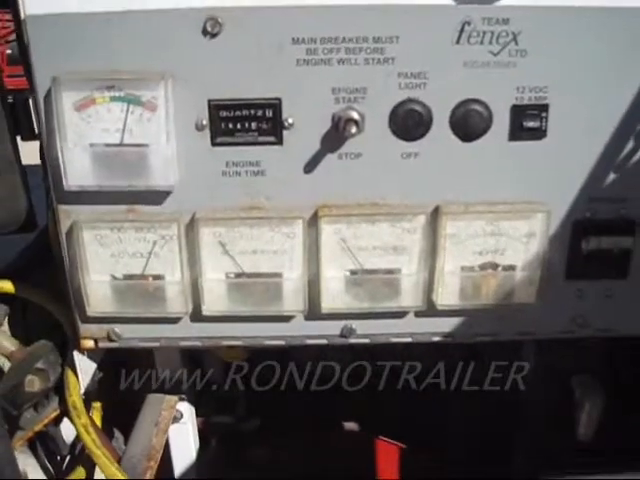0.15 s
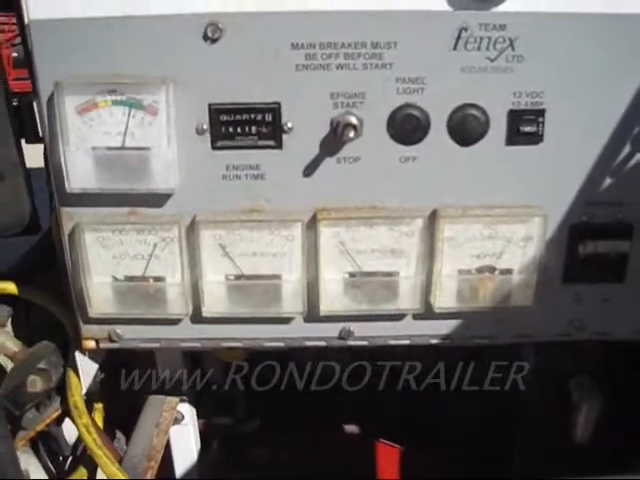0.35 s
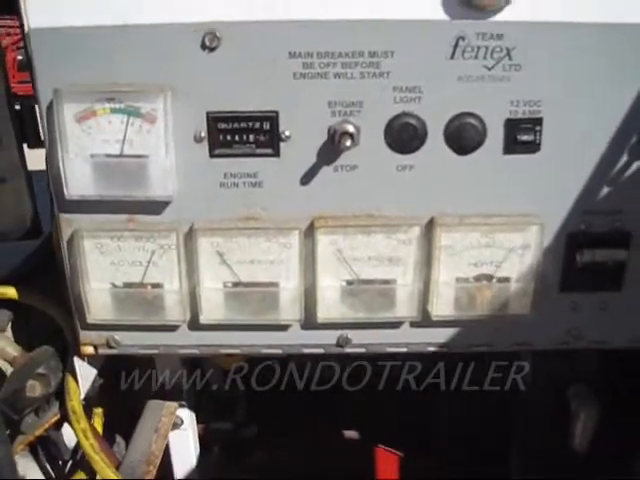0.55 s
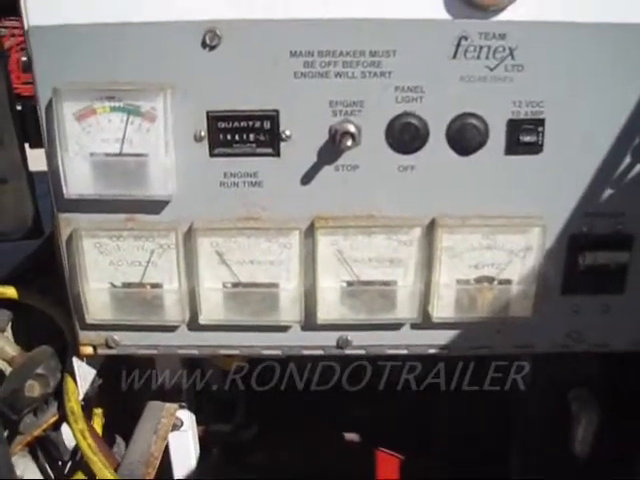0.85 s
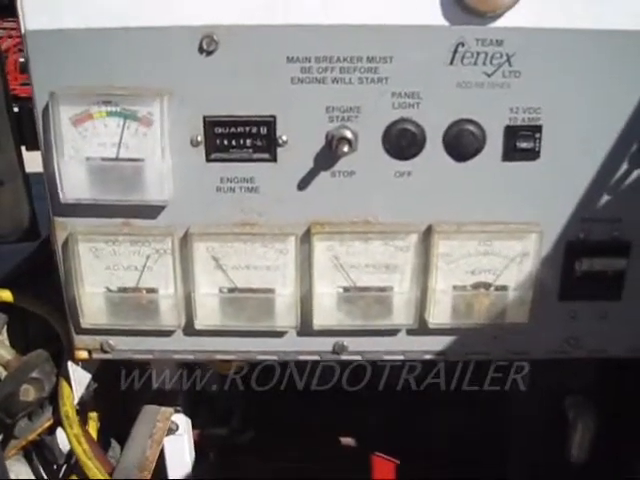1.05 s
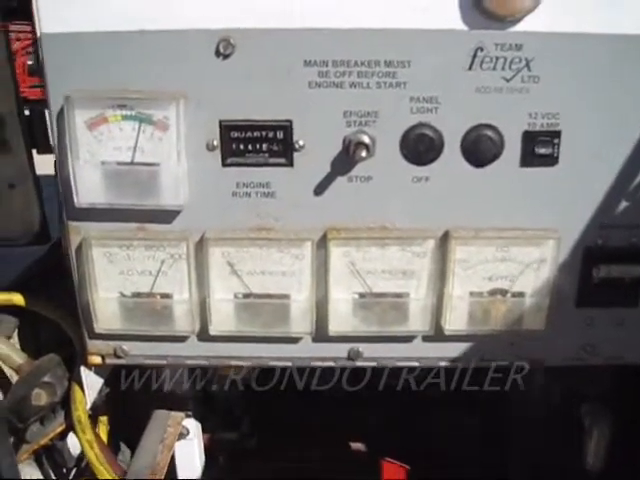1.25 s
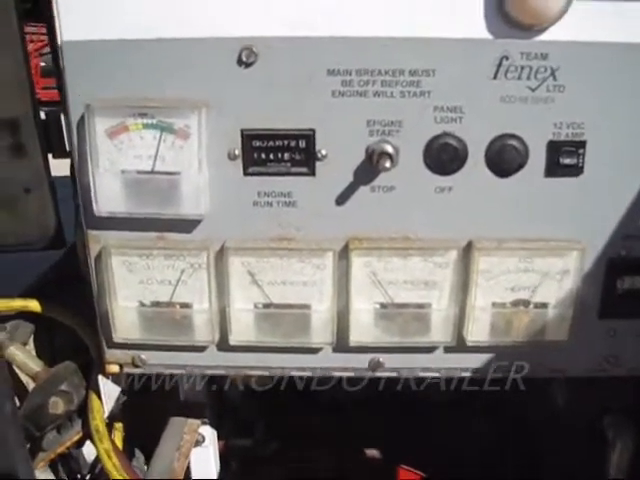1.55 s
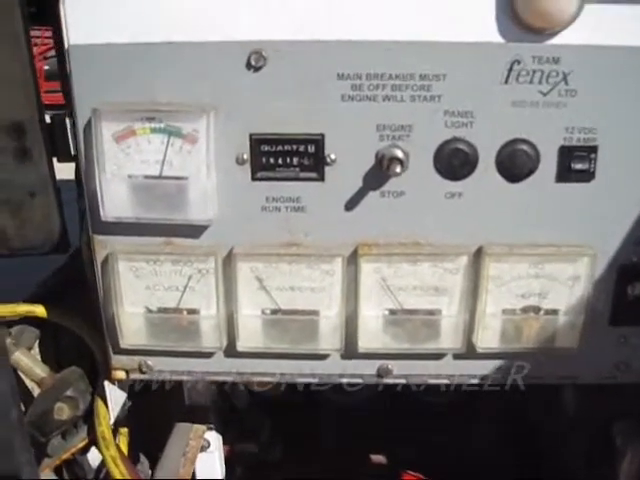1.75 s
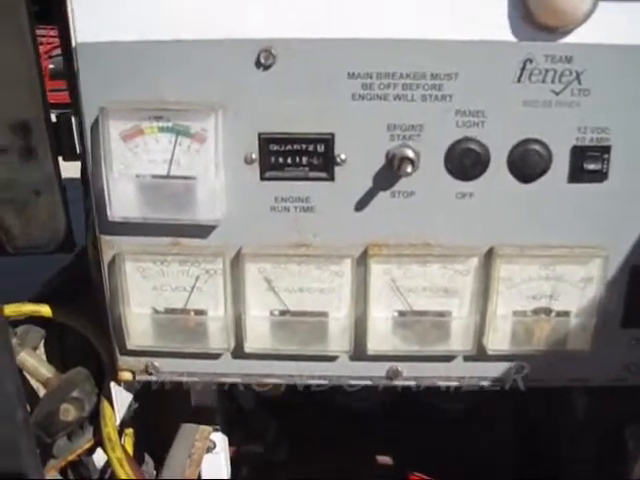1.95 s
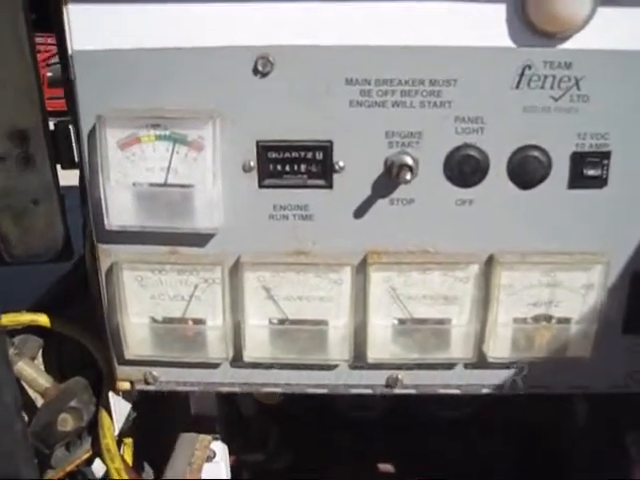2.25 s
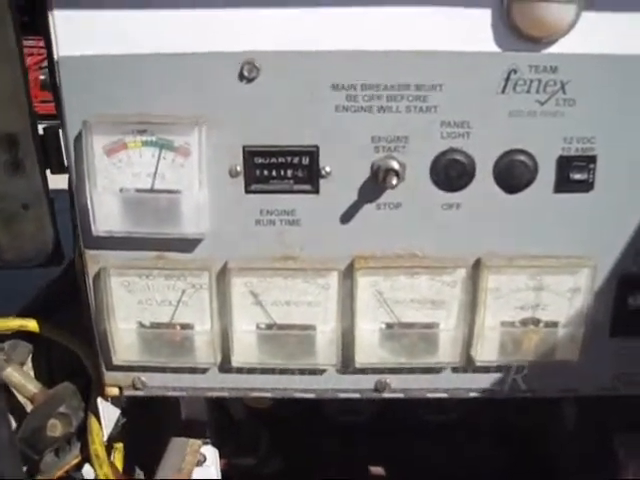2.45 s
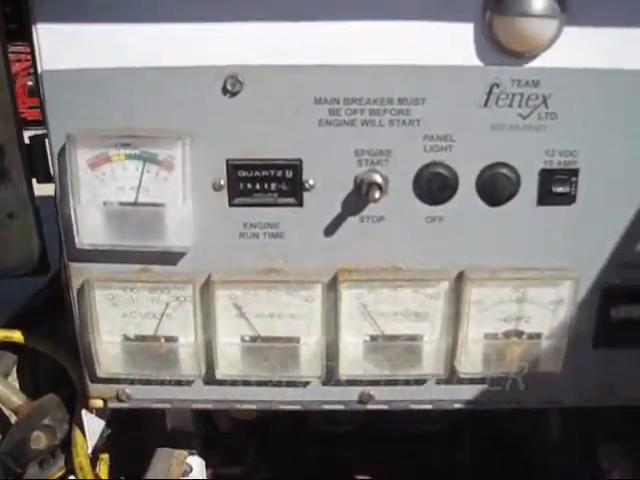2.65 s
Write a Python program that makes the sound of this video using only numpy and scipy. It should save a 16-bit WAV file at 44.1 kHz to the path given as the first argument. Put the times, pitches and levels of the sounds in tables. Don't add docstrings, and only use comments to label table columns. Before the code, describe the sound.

A small four-stroke generator engine runs steadily in an equipment bay, its low boomy drone rising slightly then sagging under load, with blower air behind and a faint metal rattle near the end, close mono microphone.

```python
import sys
import numpy as np
from scipy import signal
from scipy.io import wavfile
from scipy.ndimage import uniform_filter1d

SR = 44100
rng = np.random.default_rng(int(sys.argv[2]) if len(sys.argv) > 2 else 0)


def decibels_to_gain(level_db):
    exponent = np.asarray(level_db, float) / 20
    return 10 ** exponent


def persist_wave(psi):
    counts = np.round(np.clip(psi, -1, 1) * 32767).astype(np.int16)
    wavfile.write(sys.argv[1], SR, np.atleast_2d(counts).T)


N = 123479

# time_s, hum_hz
ENGINE_HUM = [(0.0, 61.41), (0.15, 61.57), (0.3, 62.38), (0.5, 62.56), (0.7, 62.99), (0.9, 62.36),
              (1.1, 61.95), (1.3, 61.2), (1.5, 60.51), (1.7, 59.84), (1.9, 59.58), (2.1, 59.4),
              (2.3, 58.81), (2.55, 58.79), (2.8, 58.99)]
# time_s, nearness_db
NEARNESS = [
    (0, -32),
    (.3, -30.5),
    (.6, -27.5),
    (.9, -27.5),
    (1.2, -28),
    (1.5, -28),
    (1.8, -30.5),
    (2.1, -28.5),
    (2.45, -29.5),
    (2.8, -31),
]
# multiple, level_db [rms at 59.5 Hz hum], slope_db_per_hz [of hum]
ENGINE_ORDERS = [(4, -23.5, -0.9), (5, -49, -2), (8, -34, 2), (9, -33, 0.8), (11, -33.5, -0.8),
                 (12, -32, -0.64), (16, -35, 0.5), (17, -34, 1.4), (19, -29, -0.34), (20, -27, -5),
                 (21, -46, 1.5), (26, -40.5, 1.3), (33, -48, -15.5)]
# pitch_hz, width_hz, level_db
BAY_MODES = [(47.2, 40, -14.5), (78.3, 14.8, -11), (137.9, 24, -12), (175, 24.6, -7), (206.3, 25, -5),
             (235.2, 12.1, -7), (252, 25, -5.5), (296.7, 55, -13.5), (320.8, 43, -18)]
# pitch_hz, level_db [per Hz]
ROAR_COLOUR = [(190, -9), (320, -11), (346, -6), (384, 1.5), (477, 3.5), (518, -2), (622, -1.5), (850, -9),
               (1220, -13), (1700, -30.5), (2210, -26.5), (3740, -120)]
# pitch_hz, width_hz, level_db
PANEL_MODES = [(391.3, 56, -35.5), (495.4, 13, -50.5), (571, 52, -42), (628, 28, -44), (736, 11, -51.5),
               (795, 130, -49), (985, 6.9, -54.5), (1258, 28, -52)]
# pitch_hz, level_db [per Hz]
RUSH_COLOUR = [(760, 1), (1550, -7), (2000, -6.5), (3270, -11.5), (4300, -15.5), (5000, -20), (6470, -23),
               (12600, -28.5), (15100, -25), (15900, -36)]
# time_s, level_db
AIRFLOW = [
    (0, -1.1),
    (.4, 0),
    (.9, 1.1),
    (1.4, 2),
    (1.9, 0.8),
    (2.3, 1.9),
    (2.8, 1.4),
]
# pitch_hz, width_hz, level_db, loudest_s
WHINING_PANELS = [(1990, 20, -62, 2.0), (15640, 180, -69, 2.2), (7100, 200, -74, 1.0),
                  (8040, 200, -70, 1.6), (8500, 220, -67, 1.4), (8810, 150, -72, 2.2),
                  (9230, 150, -74, 1.3), (10090, 140, -73, 1.4), (10540, 120, -72, 1.8),
                  (11820, 200, -66.5, 1.9), (12500, 200, -76, .6), (13270, 120, -73, 1.6),
                  (13560, 130, -72, 1.8), (13810, 100, -75, .8), (14305, 120, -71.5, 1.6),
                  (14620, 80, -73, 2.0), (14900, 120, -70, .9), (15135, 16, -71, 2.0),
                  (15465, 70, -69.5, 2.2)]
# time_s, pitch_hz, peak_db, length_s
HARD_FIRINGS = [(0.052, 247, -26.5, 0.04), (0.59, 179.7, -32, 0.037), (0.666, 239.6, -19, 0.044),
                (0.864, 205, -25.5, 0.054), (1.123, 134, -34, .07), (1.354, 246.1, -21, 0.11),
                (1.46, 178.2, -23, 0.055), (1.91, 246.2, -21, 0.052), (2.106, 234.7, -21.5, 0.066),
                (2.217, 175, -22, 0.072), (2.54, 172, -26, 0.057), (.52, 189.5, -27, .06),
                (.59, 130, -23.5, .06), (1.04, 485, -29.5, 0.052), (1.57, 287, -20, 0.11)]
# start_s, level_db [rms], rise_s, dulling_db_per_khz
KNOCKS = [
    (2.3235, -36.5, .0045, -.25),
    (2.3445, -39, .002, -2.5),
    (2.366, -43, .003, -2.2),
    (2.399, -39.5, .008, -.65),
]
# pitch_hz, width_hz, level_db, t60_s
FITTING_MODES = [(2100, 900, -5, .09), (2800, 450, -8, .12), (3600, 1100, -6, .07), (4550, 700, -5, .055),
                 (5200, 900, -7, .045), (6050, 600, -2.5, .045), (7000, 1300, -5, .04),
                 (8000, 900, -5, .045), (9000, 1200, -5, .05), (10500, 1800, -9, .03),
                 (13500, 3500, -13, .015)]


def evened(x):
    return x / np.sqrt(np.mean(x ** 2) + 1e-20)


def control(table):
    time_s, value = np.transpose(table)
    curve = np.interp(np.arange(N) / SR, time_s, value)
    return uniform_filter1d(curve, size=3000, mode="nearest")


def slow(top_hz, count):
    t = np.arange(0, N + 128, 64)[:, None] / SR
    hz = top_hz * np.geomspace(.1, 1, 16)
    curves = []
    for phase in rng.random((count, 16)):
        wander = evened((np.sin(2 * np.pi * (hz * t + phase)) / np.sqrt(hz)).sum(1))
        curves.append(np.interp(np.arange(N) / SR, t[:, 0], wander))
    return curves


def resonate(x, hz, width_hz):
    turn = np.exp(2j * np.pi * hz * np.arange(len(x)) / SR)
    r = np.exp(-np.pi * width_hz / SR)
    return 2 * (turn * signal.lfilter([1 - r], [1, -r], x / turn)).real


def sing(table, swell_db):
    air, t = rng.standard_normal(N), np.arange(N) / SR
    out = np.zeros(N)
    for (hz, width_hz, db, *spot), swell in zip(table, slow(.9, count=len(table))):
        fall_db = 5 * sum(abs(t - at) for at in spot)
        tone = evened(resonate(resonate(air, hz, width_hz), hz, width_hz))
        out += decibels_to_gain(db + swell_db * swell - fall_db) * tone
    return out


def patchy_noise(colour_points, patchy_db, ridge_db, size):
    frames, hz = N * 4 // size + 12, np.fft.rfftfreq(size, 1 / SR)
    a, b, patches, ridges = rng.standard_normal((frames, len(hz), 4)).T
    patches = evened(uniform_filter1d(uniform_filter1d(patches, size=8, axis=0), size=14, axis=1))
    ridges = evened(uniform_filter1d(uniform_filter1d(ridges, size=3, axis=0), size=120, axis=1))
    f, level_db = np.transpose(colour_points)
    colour_db = np.interp(np.log(hz + 1), np.log(f + 1), level_db, left=-100, right=-100)
    z = (a + 1j * b) * decibels_to_gain(colour_db[:, None] + patchy_db * patches + ridge_db * ridges)
    noise = signal.istft(z, nperseg=size, noverlap=size * 3 // 4)[1]
    return evened(noise[size:N + size])


def engine_orders(hum_hz):
    boom_hz, boom_width_hz, boom_db = 286, 5, 6
    waver_db, waver_hz, drift_rad = 1.7, 16, .35
    cycle_hz = hum_hz * .25
    turns, out = np.cumsum(cycle_hz) / SR, np.zeros(N)
    count = len(ENGINE_ORDERS)
    wavers, drifts = slow(waver_hz, count), slow(waver_hz, count)
    for (k, db, slope_db), waver, drift, phase in zip(ENGINE_ORDERS, wavers, drifts, rng.random(count)):
        boom = boom_db / (1 + ((k * cycle_hz - boom_hz) / boom_width_hz) ** 4)
        level_db = db + slope_db * (hum_hz - 59.5) + boom + waver_db * waver * np.sqrt(k / 8)
        angle = 2 * np.pi * (k * turns + phase) + drift_rad * drift * k / 8
        out += np.sqrt(2) * decibels_to_gain(level_db) * np.sin(angle)
    return out


def exhaust(hum_hz, near_db):
    bay_db, bay_follow, roar_db = -24, 0.81, -27.5
    puff = 1 + .07 * np.cos(2 * np.pi * np.cumsum(hum_hz) / SR)
    bay = evened(sing(BAY_MODES, swell_db=1.46))
    roar = decibels_to_gain(roar_db) * patchy_noise(ROAR_COLOUR, patchy_db=0.12, ridge_db=1.5, size=2048)
    panels = sing(PANEL_MODES, swell_db=0.2)
    return puff * (decibels_to_gain(bay_db + bay_follow * near_db) * bay + decibels_to_gain(near_db) * (roar + panels))


def blower():
    rush = decibels_to_gain(-41) * patchy_noise(RUSH_COLOUR, patchy_db=-0.33, ridge_db=1.5, size=2048)
    return decibels_to_gain(control(AIRFLOW)) * (rush + sing(WHINING_PANELS, swell_db=1.5))


def bay_surges():
    t, out = np.arange(N) / SR, np.zeros(N)
    for (s, hz, db, length_s), phase in zip(HARD_FIRINGS, rng.random(len(HARD_FIRINGS))):
        swell = np.exp(-2 * ((t - s) / length_s) ** 2)
        out += np.sqrt(2) * decibels_to_gain(db) * swell * np.sin(2 * np.pi * (hz * t + phase))
    return out


def fitting_rattles():
    out, t = np.zeros(N), np.arange(8000) / SR
    for (s, db, rise_s, dull_db), scuff in zip(KNOCKS, rng.standard_normal((len(KNOCKS), len(t)))):
        ring = np.zeros(len(t))
        for k, (hz, width_hz, mode_db, t60_s) in enumerate(FITTING_MODES):
            decay_db = 60 * np.maximum(t - rise_s, 0) / t60_s
            mode = evened(resonate(resonate(scuff, hz, width_hz), hz, width_hz))
            ring += (-1) ** k * decibels_to_gain(mode_db + dull_db * hz / 1000 - decay_db) * mode
        ring *= np.minimum(t / rise_s, 1) ** 2
        peak_rms = ring[round(rise_s * SR):][:256].std()
        out[round(s * SR):][:len(t)] += decibels_to_gain(db) * ring / peak_rms
    return out


def scene():
    hum_hz, near_db = control(ENGINE_HUM), control(NEARNESS)
    near_db = near_db - near_db.mean()
    engine = decibels_to_gain(.5 * near_db) * engine_orders(hum_hz)
    mix = engine + exhaust(hum_hz, near_db) + blower() + bay_surges() + fitting_rattles()
    return mix[None]


def top_cut(x):
    return signal.sosfilt(signal.butter(12, 16080, fs=SR, output="sos"), x)


def record(dry):
    start = np.minimum(np.arange(N) / 150, 1)
    treble_limit = signal.firwin(1023, 15760, window=("kaiser", 10), fs=SR)[None]
    mix = signal.oaconvolve(dry * start, treble_limit, "same")
    return top_cut(mix)


dry = scene()
out = record(dry)
persist_wave(out)
```